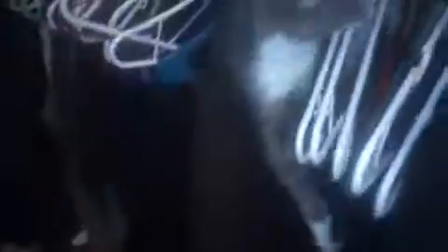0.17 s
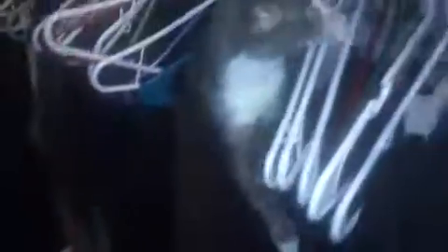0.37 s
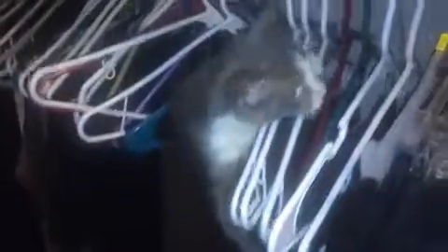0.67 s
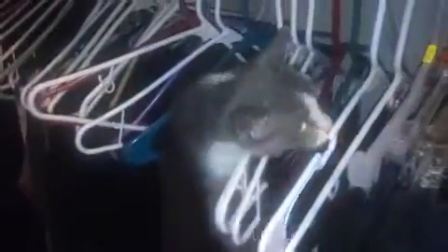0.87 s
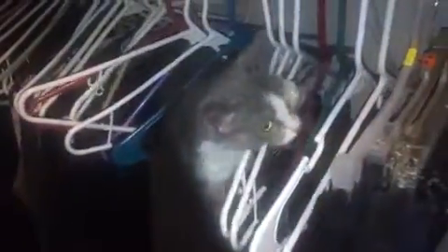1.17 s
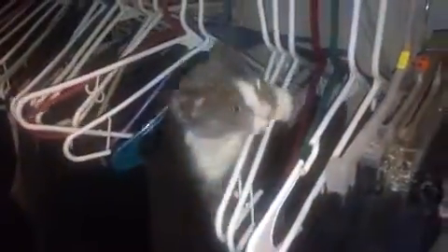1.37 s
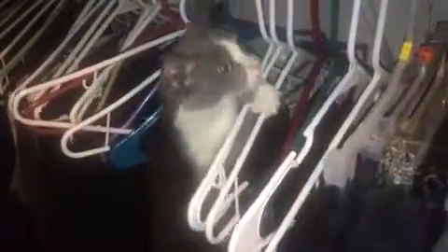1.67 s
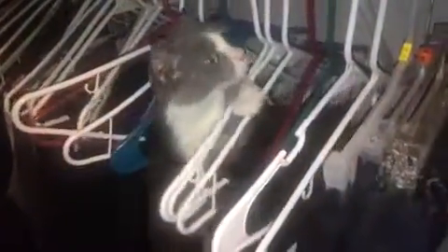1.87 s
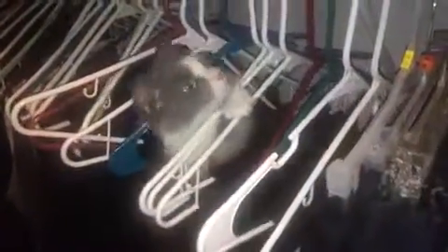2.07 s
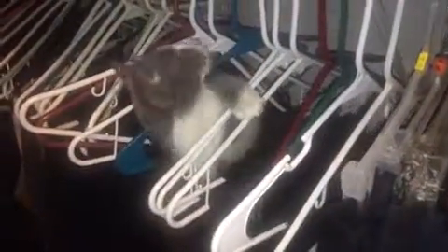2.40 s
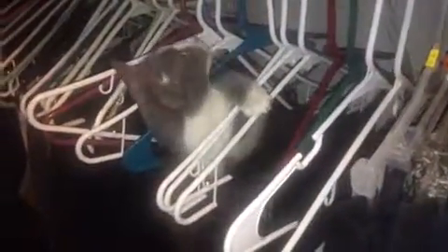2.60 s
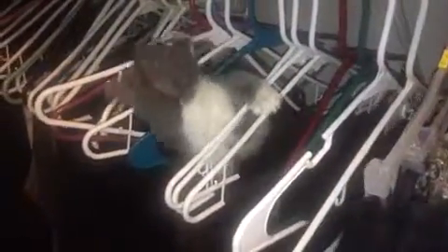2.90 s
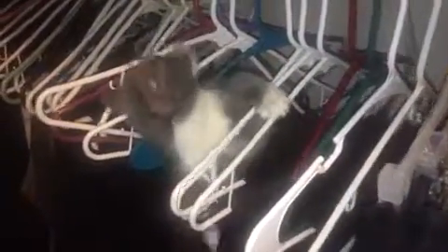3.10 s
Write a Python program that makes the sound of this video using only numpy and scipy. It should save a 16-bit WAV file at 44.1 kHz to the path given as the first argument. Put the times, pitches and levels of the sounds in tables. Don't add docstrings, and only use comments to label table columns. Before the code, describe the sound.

Plastic coat hangers knock and click in a quiet closet, with one loud clack near two seconds.

```python
import sys
import numpy as np
from scipy import signal
from scipy.fft import rfft, irfft
from scipy.io import wavfile
from scipy.ndimage import uniform_filter1d

SR = 44100
rng = np.random.default_rng(int(sys.argv[2]) if len(sys.argv) > 2 else 0)


def bounce(signal):
    frames = np.transpose(np.atleast_2d(signal))
    limited = np.clip(frames, -1, 1)
    pcm = np.round(limited * 32767).astype(np.int16)
    wavfile.write(sys.argv[1], SR, pcm)


def volts_from_decibels(level):
    exponent = np.asarray(level, float) / 20
    return 10 ** exponent


N = 143325
START_S = 0.2022


def level(x, db):
    return x * volts_from_decibels(db) / np.sqrt(np.mean(x ** 2))


def band(x, hz, width):
    return signal.lfilter(*signal.iirpeak(hz, hz / width, fs=SR), x)


def add(out, s, sound):
    i = int(s * SR)
    out[i:i + len(sound)] += sound[:N - i]


def walk(rate):
    k = int(SR / rate)
    steps = np.repeat(rng.standard_normal(N // k + 1), k)
    smooth = uniform_filter1d(uniform_filter1d(steps, k), k)
    return 0.76 * smooth[:N]


def coloured(shape, db):
    hz, gain = np.array(shape).T
    f = np.fft.rfftfreq(N, 1 / SR) + 1
    weight = volts_from_decibels(np.interp(np.log(f), np.log(hz), gain))
    weight = weight * (f > hz[0]) * (f < hz[-1])
    return level(irfft(rfft(rng.standard_normal(N)) * weight, N), db)


# freq_hz [Hz], density_db [dB per Hz]
RUMBLE_SHAPE = [(15, -46.5), (30, -16.5), (60, -7), (114, 0.5), (165, -13.5), (300, -23.5), (420, -32.5),
                (900, -37), (1200, -81)]
# freq_hz [Hz], density_db [dB per Hz]
HISS_SHAPE = [(530, -32), (900, -6), (2100, -6.5), (3430, -5), (4500, -6), (6000, -9.5), (8340, -15),
              (10300, -22.5), (13000, -53)]
# centre_hz [Hz], width_hz [Hz], level_db [dB]
MOTOR_HUMS = [
    (120.06, 17.23, -56.5),
    (301.6, 15, -72),
    (201.8, 27, -66),
]
# pitch_hz [Hz], level_db [dB]
FAN_TONES = [
    (258.4, -62),
    (371, -76.5),
]
RUMBLE_DB, HISS_DB = -51.5, -70
SWELL_DB, FLICKER_DB = 1.5, 1.5
SETTLE_DB, SETTLE_S = 4.5, 0.1


def house():
    t = np.arange(N) / SR
    rumble = coloured(RUMBLE_SHAPE, RUMBLE_DB)
    settle = SETTLE_DB * np.exp(-np.abs(t - START_S) / SETTLE_S)
    swell = SWELL_DB * walk(0.81) + FLICKER_DB * walk(14)
    rumble = rumble * volts_from_decibels(swell + settle)
    hums = sum(level(band(rng.standard_normal(N), hz, width), db) for hz, width, db in MOTOR_HUMS)
    for hz, db in FAN_TONES:
        strength = volts_from_decibels(2.68 * walk(5.948))
        tone = np.sin(2 * np.pi * hz * t + 0.4 * walk(4.4))
        hums = hums + level(strength * tone, db)
    hiss = coloured(HISS_SHAPE, HISS_DB) * volts_from_decibels(0.5 * walk(1.4))
    return rumble + hums + hiss


# centre_hz [Hz], width_hz [Hz], level_db [dB]
CASE_RESONANCES = [
    (1700, 840, -11),
    (3337, 1078, 1.5),
    (5560, 3500, -16),
]
# multiple [of WHINE_HZ], level_db [dB]
WHINE_PARTIALS = [(3, -90.5), (4, -94.5), (5, -87), (6, -89.5), (7, -88), (8, -93), (9, -98.5)]
WHINE_HZ = 735.6
TICK_HZ, TICK_START_S, TICK_JITTER_S = 59.98, -0.0008, 0.0009
TICK_DB, TICK_SCATTER_DB = -30, 1.58


def ticks():
    pulse, t = np.zeros(N), np.arange(N) / SR
    chance = rng.standard_normal((int(N / SR * TICK_HZ) - 1, 2))
    for k, c in enumerate(chance):
        s = TICK_START_S + (k + 1) / TICK_HZ + TICK_JITTER_S * c[0]
        add(pulse, s, volts_from_decibels(TICK_DB + TICK_SCATTER_DB * c[1:]))
    whine = np.zeros(N)
    for multiple, db in WHINE_PARTIALS:
        phase = 2 * np.pi * round(multiple) * WHINE_HZ * t + 0.5 * walk(3)
        whine += level(np.sin(phase), db)
    ring = sum(volts_from_decibels(db) * band(band(pulse, hz, width), hz, 2 * width) for hz, width, db in CASE_RESONANCES)
    return whine + ring


RUB_HZ, RUB_WIDTH_HZ, RUB_DB = 866, 735, -63.5
RUB_S, RUB_GRAIN_DB = 0.2126, 5


def rub():
    t = np.maximum(np.arange(N) / SR - START_S, 0)
    noise = level(band(rng.standard_normal(N), RUB_HZ, RUB_WIDTH_HZ), RUB_DB)
    return noise * volts_from_decibels(RUB_GRAIN_DB * walk(117.5)) * np.exp(-t / RUB_S)


# start_s [s], level_db [dB], length_ms [ms], direction [signed factor]
BODY_PUSHES = [(0.2307, -28.5, 2.19, 0.84), (0.239, -31, 1.93, 0.52), (0.2415, -25.5, 2.49, 0.877),
               (.225, -44.5, 4.1, -0.63), (0.2965, -31.5, 1.177, 1), (0.354, -34, 7.55, -1.074),
               (.3612, -25.5, 5.5, 0.711), (0.4166, -34, 3.146, -1.12), (0.4228, -40, 2.6, 1),
               (0.48, -47.5, 2.82, 0.98), (1.289, -44, 7.4, 1), (1.3002, -34, 0.913, -0.84),
               (1.2999, -38, 1.49, -0.81), (1.3007, -34.5, 8.1, 0.41), (1.590, -41, 2.3, -1.11),
               (2.181, -43, 8.1, -1.34), (2.188, -30, 2.276, 0.67), (2.190, -41.5, 4.42, 0.86)]
PUSH_SKEW = 0.777
THUD_RING_HZ, THUD_RING_WIDTH_HZ, THUD_RING_DB = 89.3, 48.4, 3.5


def thuds():
    push = np.zeros(N)
    for s, db, ms, way in BODY_PUSHES:
        phase = np.linspace(0, 1, int(ms * SR / 1000) + 2) ** PUSH_SKEW
        add(push, s, way * volts_from_decibels(db) * np.sin(np.pi * phase) ** 2)
    return push + volts_from_decibels(THUD_RING_DB) * band(push, THUD_RING_HZ, THUD_RING_WIDTH_HZ)


# start_s [s], level_db [dB], pitch_hz [Hz], t60_s [s]
ARM_KNOCKS = [(.2335, -43.5, 433, 0.019), (.244, -46.5, 476, 0.0344), (0.25, -54, 1505, 0.015),
              (.278, -40, 848, 0.015), (.2815, -38.5, 596, 0.0188), (.298, -45.5, 705, 0.041),
              (.2985, -59.5, 1161, 0.01), (.300, -40.5, 346, 0.022), (.362, -39.5, 463.5, 0.0235),
              (.419, -45.5, 342, 0.029), (1.120, -40.5, 789, 0.0226), (1.1235, -43.5, 654, 0.0168),
              (1.906, -44, 768.3, .03), (1.909, -44, 719, 0.0278), (1.9045, -43.5, 526, 0.0173),
              (2.186, -46, 805, 0.0115)]
KNOCK_RISE_S = 0.00064


def knocks():
    out, t = np.zeros(N), np.arange(SR // 10) / SR
    onset = 1 - np.exp(-t / KNOCK_RISE_S)
    for s, db, hz, t60 in ARM_KNOCKS:
        decay = volts_from_decibels(db - 60 * t / t60)
        add(out, s, decay * onset * np.sin(2 * np.pi * hz * t))
    return out


# start_s [s], level_db [dB], ring_share [of full t60], tilt_db [dB per octave]
HANGER_CONTACTS = [(.760, -62, 0.55, -7), (1.002, -63.5, .3, -10.5), (1.019, -74, 0.18, 7),
                   (1.0315, -60.5, 0.24, -0.5), (1.452, -54.5, 0.28, -1), (1.454, -60, .3, 1.5),
                   (1.482, -70, .3, 9), (1.581, -61.5, .3, -0.5), (1.775, -65.5, 0.34, -10.5),
                   (1.872, -63, 0.46, -7.5), (1.92, -62.5, .2, 2), (1.9247, -60.5, .4, -7.5),
                   (2.183, -62.5, 0.31, -0.5), (2.1953, -44, 0.934, 2), (2.1970, -58, 0.7, 9.5),
                   (2.2001, -50.5, 0.67, -7), (2.2035, -56, 0.47, 11), (2.2104, -69.5, 1.13, -0.5),
                   (2.2160, -61.5, 0.7, -2), (2.227, -63, .5, -4.5), (.257, -64.5, 0.224, 0.5),
                   (0.344, -60.5, 0.15, 8), (1.192, -67.5, 0.28, 3), (1.204, -66.5, .4, -1.5)]
# mode_hz [Hz], level_db [dB], t60_s [s]
HANGER_MODES = [(2235, -7, .04), (2790, -5, .04), (3340, -5, .04), (3750, -9, .03), (4085, 3, .055),
                (4400, -12, .035), (4685, 3, .035), (4930, -5, .026), (6590, -9, .05), (6890, -12, .09),
                (7500, -9, .018), (8010, -12, .032), (8730, -14, .032), (10200, -27, .03)]
CRACK_DB, CRACK_S, MODE_SCATTER_DB = 2, 0.003, 1.0


def clicks():
    out, t = np.zeros(N), np.arange(SR // 10) / SR
    hz, gain, t60 = np.array(HANGER_MODES).T[:, :, None]
    chance = rng.standard_normal((len(HANGER_CONTACTS), len(HANGER_MODES), 3, 1))
    cracks = rng.standard_normal((len(HANGER_CONTACTS), len(t)))
    for (s, db, ring, tilt_db), c, crack in zip(HANGER_CONTACTS, chance, cracks):
        weight_db = gain + MODE_SCATTER_DB * c[:, 0] + tilt_db * np.log2(hz / 4000)
        decay_db = -60 * t / (t60 * max(ring, 0.05))
        phase = 2 * np.pi * hz * (1 + 0.0014 * c[:, 1]) * t + np.pi * c[:, 2]
        modes = (volts_from_decibels(weight_db + decay_db) * np.sin(phase)).sum(axis=0)
        burst = band(crack * np.exp(-t / CRACK_S), 3700, 3900)
        add(out, s, volts_from_decibels(db) * (modes + volts_from_decibels(CRACK_DB) * burst))
    return signal.sosfilt(signal.butter(2, 1700, "high", fs=SR, output="sos"), out)


def scene():
    return (house() + ticks() + thuds() + knocks() + clicks() + rub())[None]


def low_pass(x):
    return signal.sosfilt(signal.butter(12, 10480, fs=SR, output="sos"), x)


TOP_HZ, FADE_S = 10500, 0.00086
LEAD_IN_DB, LEAD_IN_DB_PER_S = -26, 900


def record(dry):
    t = np.arange(N) / SR
    x = signal.sosfilt(signal.butter(2, 28, "high", fs=SR, output="sos"), dry)
    x = signal.sosfilt(signal.ellip(8, 0.2, 30, TOP_HZ, fs=SR, output="sos"), x)
    lead_in = volts_from_decibels(LEAD_IN_DB + LEAD_IN_DB_PER_S * (t - START_S))
    opening = 1 - np.exp(-np.abs(t - START_S) / FADE_S)
    mix = x * np.where(t < START_S, lead_in, opening)
    return low_pass(mix)


dry = scene()
out = record(dry)
bounce(out)
```